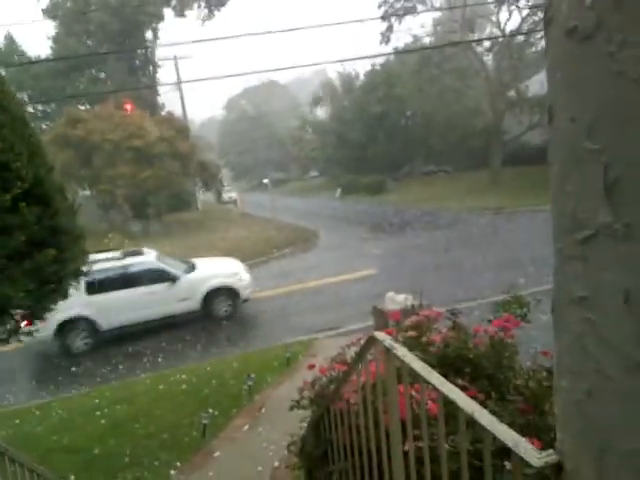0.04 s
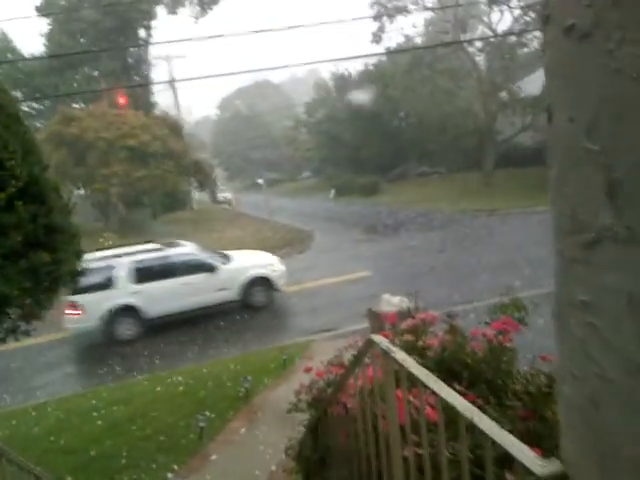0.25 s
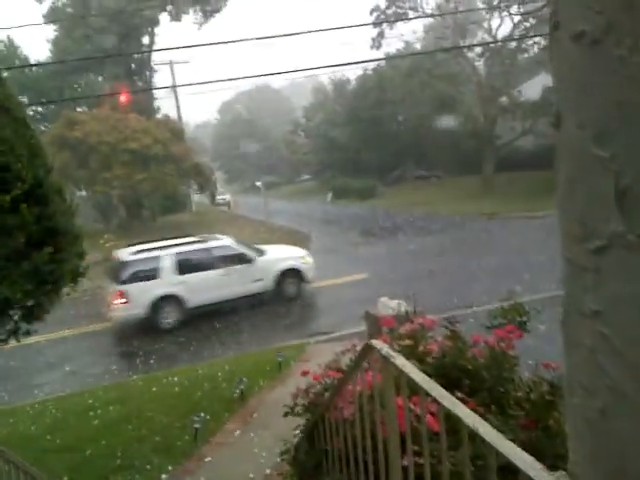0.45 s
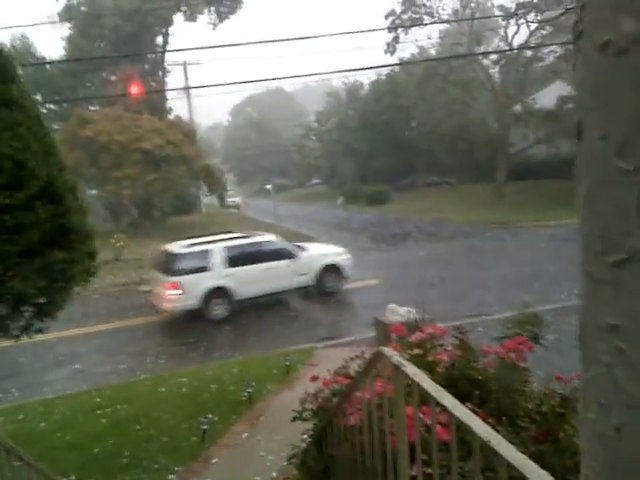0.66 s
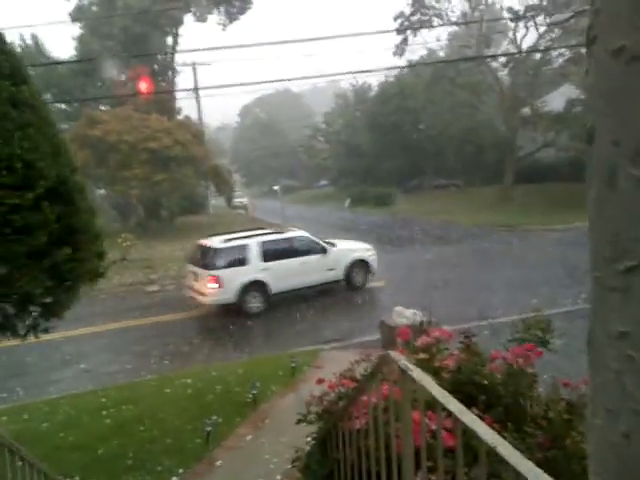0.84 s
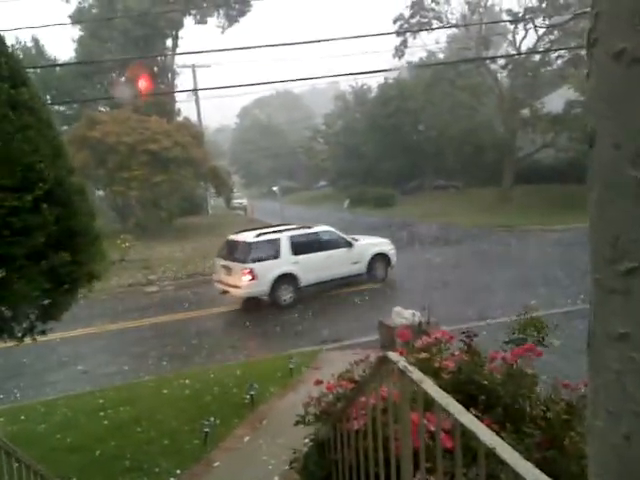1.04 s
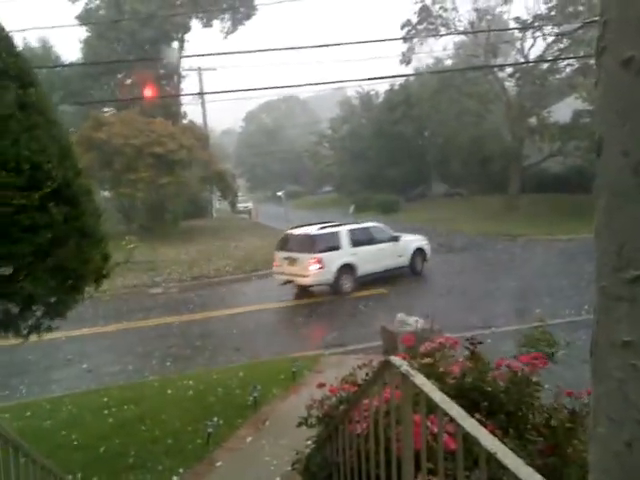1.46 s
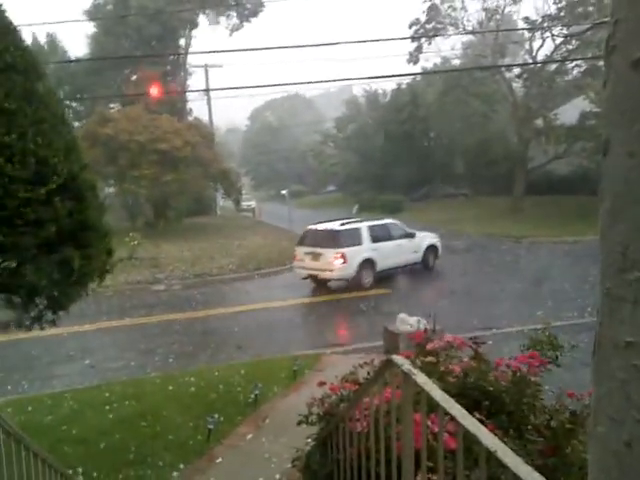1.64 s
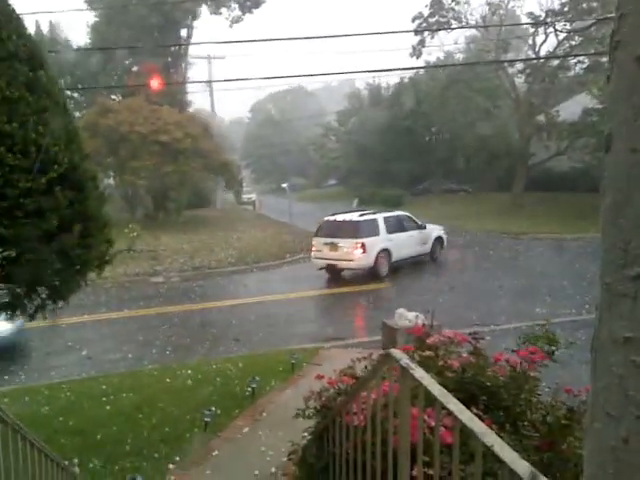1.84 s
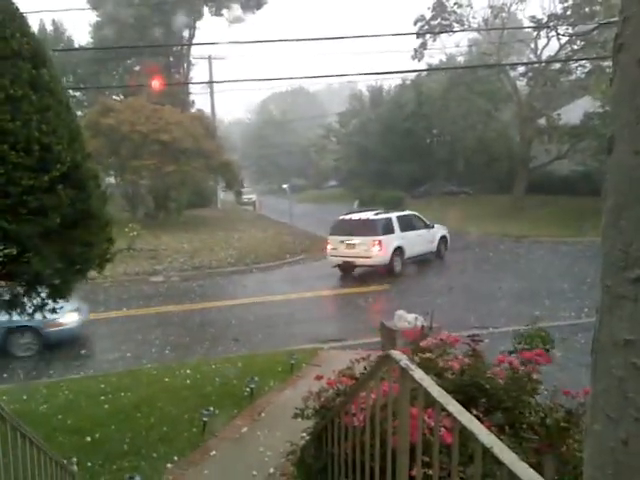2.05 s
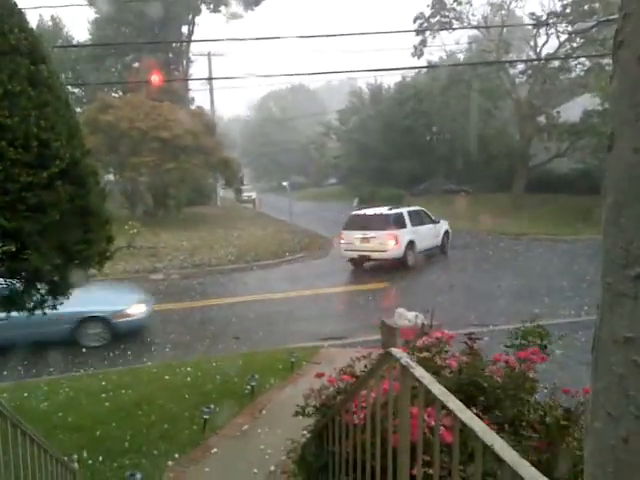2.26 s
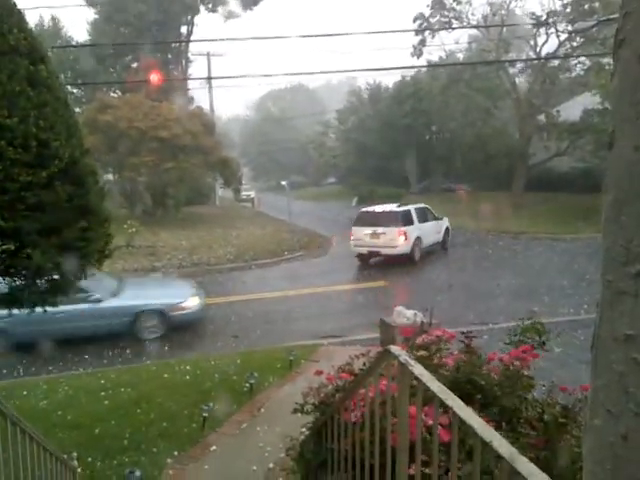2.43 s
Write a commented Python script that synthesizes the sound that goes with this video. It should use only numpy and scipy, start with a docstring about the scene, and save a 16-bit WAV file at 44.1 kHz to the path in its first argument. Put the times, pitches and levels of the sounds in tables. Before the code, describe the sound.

Hail clatters irregularly all around, with steady rain and tyres hissing on a wet street.

```python
"""Hail in heavy rain, heard from a microphone under a porch roof.
Overhead the heaviest stones thud on the roof, whose panel booms on after them. Others knock on
hard surfaces all around, each ringing the spot it strikes, and small ones patter farther off.
Behind them rain washes down, tyres hiss on the wet street and gusts rumble on the microphone."""
import sys
import numpy as np
from scipy.fft import rfft, irfft, next_fast_len
from scipy.io import wavfile
from scipy.ndimage import uniform_filter1d, map_coordinates

SR = 44100
rng = np.random.default_rng(int(sys.argv[2]) if len(sys.argv) > 2 else 0)


def to_wav(s):
    """Save 16-bit WAV."""
    ch = np.atleast_2d(s).T  # columns
    pcm = np.round(np.clip(ch, -1, 1) * 32767)  # PCM
    wavfile.write(sys.argv[1], SR, pcm.astype(np.int16))


N = 114660

# wind on the microphone: time_s, rumble_db, flutter_db
GUST_LEVELS = [(0,-53,-54), (.36,-48.5,-72), (.46,-39.5,-37.5), (.56,-57.5,-53.5), (.8,-49.5,-68),
               (0.859,-56,-47), (0.931,-53.5,-70.5), (1.13,-54,-56.5), (1.189,-49,-36), (1.235,-52,-44.5),
               (1.279,-30,-35), (1.328,-41,-30), (1.355,-42,-44.5), (1.55,-43,-40), (1.6,-44,-45),
               (1.65,-52,-37), (1.72,-39,-49), (1.78,-46.5,-51), (1.821,-30.5,-36), (1.885,-38.5,-37.5),
               (1.95,-36.5,-35), (2.069,-35,-39), (2.201,-46.5,-50.5), (2.243,-31.5,-36), (2.42,-45,-45),
               (2.49,-33.5,-41.5), (2.6,-55,-41.5)]
# its deep rumble and its higher flutter: frequency_hz, density_db
RUMBLE_SPECTRUM = [(15, -47), (25, -25), (32, -16.5), (45, 12), (70, 11), (105, 5), (160, -6.5),
                   (400, -57.5), (3000, -120)]
FLUTTER_SPECTRUM = [(60, -43), (110, -14.5), (142, 6), (175, -2.5), (215, -3), (300, -10), (400, -17),
                    (800, -27), (2000, -78), (6000, -120)]
# rain and wet tyres out in the street: frequency_hz, density_db
WASH_SPECTRUM = [(25, -26.5), (60, 9), (150, 11), (300, -1.5), (520, -0.5), (1000, 0.5), (1600, 0),
                 (2150, 4), (2800, -5.5), (3600, -10), (4600, -6.5), (5600, -15.5), (6800, -29.5),
                 (8500, -38), (12000, -54.5), (16000, -70)]
# their slow swell: time_s, level_db
WASH_SWELL = [(0, -53), (.2, -53), (.7, -49.5), (1.1, -50), (1.5, -49), (2, -48), (2.6, -48)]
# centres of a blow's bass, middle and treble: frequency_hz
ZONE_CENTRES = [500, 1600, 4200]
# where louder blows crack brighter: frequency_hz, weight
CRACK_BAND = [(5000, 0), (8000, 1)]
# knocks near the microphone and, at 0.23 s, the bright crack of the heaviest stone on the roof:
# start_s, rise_s, hold_s, pitch_hz, bass_db, middle_db, treble_db, note_db
HARD_KNOCKS = [(0.052,0.0029,0.007,1820,-54.5,-42.5,-48,-37), (0.069,0.0053,0.021,1480,-58,-42,-45,-38),
               (.23,0.0011,0.011,1620,-48,-41,-27,-29), (0.283,0.0016,0.0022,3870,-47,-55,-39.5,-26),
               (0.382,.012,.0065,3470,-59,-37,-39,-47), (0.502,0.0047,0.0072,496,-46.5,-43,-51,-42),
               (0.642,0.0054,0.011,577,-41.5,-55,-63,-41), (0.69,0.003,0.028,1420,-49.5,-44.5,-54,-43),
               (0.741,0.011,.0044,3560,-76,-47,-42.5,-44), (0.793,.004,0.017,1650,-52.5,-40,-39,-34),
               (0.867,.001,0.0046,2384,-75,-39,-42.5,-35), (0.909,0.0087,0.017,2540,-60,-41.5,-40.5,-41),
               (.986,0.0007,.001,2950,-63,-51,-42.5,-32.5), (1.072,0.0044,0.012,4970,-77,-55,-51,-49),
               (1.199,0.0059,.0079,1960,-50,-55,-49,-50), (1.308,.0068,0.0082,4400,-67,-39,-37,-43),
               (1.43,0.0097,0.013,1720,-46,-27,-35.5,-25.5), (1.469,0.0073,0.042,2320,-53.5,-41.5,-42,-43),
               (1.631,0.0052,0.011,2000,-52,-32.5,-39,-37), (1.725,0.0045,0.018,2130,-46.5,-42.5,-40.5,-37),
               (1.8502,0.0025,0.013,1014,-34.5,-29,-50,-20), (1.854,0.0011,0.0049,1325,-45,-31,-39,-23),
               (1.871,0.0025,0.005,638,-37,-34,-43,-23), (2.0058,0.00079,0.011,1066,-30.5,-30,-38,-20.5),
               (2.0175,0.0027,0.017,2240,-31,-31.5,-42,-24.5), (2.039,0.0046,0.016,2060,-42,-36.5,-37,-33),
               (2.095,0.0061,0.0059,2090,-48.5,-43,-46.5,-37), (2.171,.0015,0.018,1680,-80,-49.5,-42.5,-37),
               (2.219,0.015,0.018,464,-39,-34,-39.5,-30.5), (2.311,0.0021,0.025,1470,-33.5,-31.5,-40.5,-34),
               (2.39,0.0026,0.021,3600,-49,-40,-43.5,-44), (2.423,0.0078,0.0082,640,-42.5,-38.5,-51,-36.5),
               (2.479,0.0027,0.018,2060,-40,-39.5,-36.5,-34)]
# heavy stones overhead:
# start_s, rise_s, hold_s, pitch_hz, bass_db, middle_db, treble_db, note_db, panel_db
ROOF_STONES = [(.216,0.0087,0.019,666,-28,-16.5,-31,-24,-17.5),
               (.409,0.0021,0.015,1280,-35.5,-29.5,-38.5,-33,-57),
               (.595,0.0072,0.0086,1680,-42,-35.5,-46,-41,-59),
               (0.946,.0093,0.032,1058,-48.5,-44,-58,-51,-65),
               (1.521,0.01,0.018,436.3,-35.5,-35.5,-51.5,-34.5,-54)]
# colour of each kind of blow: frequency_hz, density_db
KNOCK_SPECTRUM = [(60, -16), (200, -11), (330, 7.5), (520, 5.5), (900, 7.5), (1400, 3.5), (2200, 8.5),
                  (2750, -0.5), (4400, -2), (5400, -7.5), (6500, -23.5), (8500, -38), (12000, -55),
                  (16000, -66)]
THUD_SPECTRUM = [(25, -13.5), (65, -20.5), (110, -3), (270, -4), (420, -4), (700, -2), (1300, -1),
                 (2200, 9.5), (2700, 4.5), (4400, 12), (6200, -1), (7300, -17), (10000, -31), (15000, -42)]
# their die-away after the hold: frequency_hz, t60_s
KNOCK_DECAY = [(150, 0.12), (700, 0.17), (2000, 0.079), (5000, 0.078), (10000, 0.031)]
THUD_DECAY = [(70, 0.72), (250, 0.37), (700, 0.25), (2000, 0.16), (5000, 0.15), (10000, 0.052)]
# modes of the roof panel: pitch_hz, level_db, t60_s
PANEL_MODES = [(269, 2.5, 0.073), (627.3, 6.5, 0.13), (677, -2, 0.061), (753, 3.5, 0.11), (1162, -10, 0.29),
               (1678, -3, 0.27)]

HISS_DB, BAND_LIMIT_HZ = -83, 15750
PATTER_PER_S, PATTER_DB, PATTER_RISE_S, PATTER_T60_S = 45, -61, 0.003, 0.065
KNOCK_GAIN_DB, THUD_GAIN_DB, PANEL_RISE_S = -1.5, -0.5, 0.0052
RING_DB, RING_WIDTH = 3, 0.31  # the struck spot's resonance: lift, half-width as a share of its pitch
NOTE_CYCLES = 52  # the spot's own note: cycles until 60 dB down
CRACK_SLOPE, CRACK_FROM_DB = 0.87, -37  # dB of top per dB of treble above this level
TAIL_DB, TAIL_T60_S = -18.5, 0.54  # the porch's reverberation


def amp(db):
    """Decibels to gain."""
    return 10 ** (np.asarray(db) / 20)


def unit(x):
    """Scale to rms 1."""
    return x / np.sqrt(np.mean(x ** 2) + 1e-20)


def along(points, hz):
    """Read (frequency_hz, value) points at hz, on a log axis."""
    frequencies, values = np.transpose(points)
    return np.interp(np.log(hz + 1), np.log(frequencies + 1), values)


def curve(rows):
    """Join (time_s, value) points, one value per sample."""
    return np.interp(np.arange(N) / SR, *np.transpose(rows))


def wobble(per_s):
    """A smooth random curve through per_s knots a second."""
    knots = rng.standard_normal(int(N * per_s / SR) + 4)
    return map_coordinates(knots, [np.arange(N) * per_s / SR])


def filtered(x, response):
    """Filter x by a gain that is a function of frequency."""
    size = next_fast_len(len(x) + 4096)
    return irfft(rfft(x, size) * response(np.fft.rfftfreq(size, 1 / SR)), size)[:len(x)]


def coloured(x, spectrum):
    """Shape x by a spectrum, at rms 1."""
    return unit(filtered(x, lambda hz: amp(along(spectrum, hz))))


def steadied(x, size):
    """Even out the chance swells of a noise over size samples."""
    return x / np.sqrt(np.abs(uniform_filter1d(x ** 2, size, axis=-1)) + 1e-20)


def add(track, start_s, sound):
    """Mix a sound in at start_s."""
    i = max(round(start_s * SR), 0)
    track[i:i + len(sound)] += sound[:max(N - i, 0)]


def recorder_hiss():
    """The recorder's own even noise, beneath everything."""
    return amp(HISS_DB) * rng.standard_normal(N)


def wind_gusts():
    """Wind buffets the microphone in lumps: a deep rumble with a flutter above it."""
    out = np.zeros(N)
    times_s, *levels = np.transpose(GUST_LEVELS)
    lumps_db = 1.37 * wobble(per_s=29.97)
    for spectrum, level_db in zip((RUMBLE_SPECTRUM, FLUTTER_SPECTRUM), levels):
        air = steadied(coloured(rng.standard_normal(N), spectrum), size=2000)
        out += air * amp(curve(list(zip(times_s, level_db))) + lumps_db)
    return out


def street_wash():
    """Dense rain and tyre spray beyond the porch, swelling as a car comes near."""
    drops = rng.standard_normal(N) * np.exp(0.5 * rng.standard_normal(N))
    return coloured(drops, WASH_SPECTRUM) * amp(curve(WASH_SWELL) + 0.27 * wobble(per_s=16))


def far_patter():
    """Many small stones farther off, each a tick of noise with its own size and brightness."""
    out, t = np.zeros(N), np.arange(SR // 8) / SR
    fade = amp(-60 * t / PATTER_T60_S) * (1 - np.exp(-t / PATTER_RISE_S))
    for when, size, brightness in rng.random((int(PATTER_PER_S * N / SR), 3)):
        tilt_db = 10 + 4 * brightness
        colour = lambda hz: amp(along(KNOCK_SPECTRUM, hz) + tilt_db * np.log2((hz + 200) / 2000))
        tick = unit(filtered(rng.standard_normal(len(t)), colour))
        size_db = 2.8 * min(-np.log(size + 1e-9), 2)
        add(out, when * N / SR, amp(PATTER_DB + size_db) * fade * tick)
    return out


def blow_colour(hz, pitch_hz, zone_db, spectrum):
    """One blow's gain at each frequency: the struck spot resonates, and louder blows crack brighter."""
    surface = amp(along(spectrum, hz))
    zones_hz = [(250, 900), (900, 2600), (2600, 9000)]
    power = [np.sum(surface[(hz > low) & (hz < high)] ** 2) / len(hz) for low, high in zones_hz]
    trim_db = np.array(zone_db) - 10 * np.log10(power)
    balance_db = along(list(zip(ZONE_CENTRES, trim_db)), hz)
    ring_db = RING_DB / (1 + ((hz / pitch_hz - 1) / RING_WIDTH) ** 2)
    crack_db = CRACK_SLOPE * (zone_db[-1] - CRACK_FROM_DB) * along(CRACK_BAND, hz)
    return surface * amp(balance_db + ring_db + crack_db)


def blow(rise_s, hold_s, pitch_hz, zone_db, note_db, spectrum, decay, lag_s, sag_db, grain):
    """One impact: a damped note and dense reflections, dying octave by octave into the porch's tail."""
    n = SR // 2
    t, hz = np.arange(n) / SR, np.fft.rfftfreq(n, 1 / SR)
    octaves_hz = np.geomspace(70, 9000, 8)
    split = np.array([np.interp(np.log(hz + 1), np.log(octaves_hz), row) for row in np.eye(8)])
    band_gains = split * blow_colour(hz, pitch_hz, zone_db, spectrum)
    echoes = rng.standard_normal(n) * np.exp(grain * rng.standard_normal(n))
    bands = steadied(irfft(rfft(echoes) * band_gains), size=1000)
    bands *= np.sqrt(np.mean(band_gains ** 2, axis=1))[:, None]
    # bending waves are slow in the bass: lag_s is the delay at 100 Hz
    age_s = np.maximum(t - lag_s * 100 / octaves_hz[:, None], 0)
    attack = np.minimum(age_s / max(rise_s, 1e-3), 1)
    held = np.clip((age_s - rise_s) / max(hold_s, 1e-3), 0, 1)
    sag = amp(sag_db * (0.5 - held))
    dying_s = np.maximum(age_s - rise_s - hold_s, 0)
    direct = amp(-60 * dying_s / along(decay, octaves_hz)[:, None])
    tail = amp(TAIL_DB - 60 * dying_s / TAIL_T60_S)
    envelope = attack * sag * np.hypot(direct, tail)
    note_attack = np.minimum(t / max(rise_s, 1e-3), 1)
    note_fade = amp(note_db - 60 * np.maximum(t - rise_s, 0) * pitch_hz / NOTE_CYCLES)
    note = note_attack * note_fade * np.sin(2 * np.pi * pitch_hz * t)
    return np.sum(bands * envelope, axis=0) + note


def hard_knocks():
    """Short hard knocks near the microphone, and the bright crack of the heaviest stone on the roof."""
    out = np.zeros(N)
    for start_s, rise_s, hold_s, pitch_hz, *zone_db, note_db in HARD_KNOCKS:
        knock = blow(rise_s, hold_s, pitch_hz, zone_db, note_db, KNOCK_SPECTRUM, KNOCK_DECAY,
                     lag_s=0.013, sag_db=1.5, grain=0.48)
        add(out, start_s, knock)
    return amp(KNOCK_GAIN_DB) * out


def roof_thuds():
    """Heavy blows on the roof above the microphone; each one sets the panel booming, at its own level."""
    out, t = np.zeros(N), np.arange(SR // 2) / SR
    panel_attack = 1 - np.exp(-t / PANEL_RISE_S)
    for start_s, rise_s, hold_s, pitch_hz, *zone_db, note_db, panel_db in ROOF_STONES:
        thud = blow(rise_s, hold_s, pitch_hz, zone_db, note_db, THUD_SPECTRUM, THUD_DECAY,
                    lag_s=0.0098, sag_db=-1.5, grain=0.69)
        add(out, start_s, thud)
        boom = sum(amp(level_db - 60 * t / t60_s) * np.sin(2 * np.pi * (hz * t + rng.random()))
                   for hz, level_db, t60_s in PANEL_MODES)
        add(out, start_s + rise_s / 2, amp(panel_db) * panel_attack * boom)
    return amp(THUD_GAIN_DB) * out


def scene():
    """Hail near and far over rain and wind, at one microphone under the porch roof."""
    return (hard_knocks() + roof_thuds() + far_patter() + street_wash() + wind_gusts())[None]


def record(dry):
    """The recorder adds a faint hiss and keeps nothing above its band limit."""
    return filtered(dry[0] + recorder_hiss(), lambda hz: hz < BAND_LIMIT_HZ)[None]


dry = scene()
out = record(dry)
to_wav(out)
```